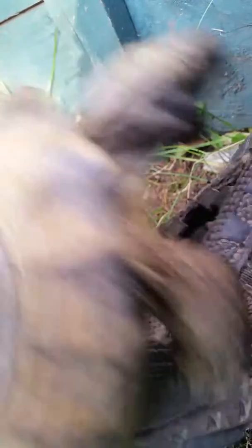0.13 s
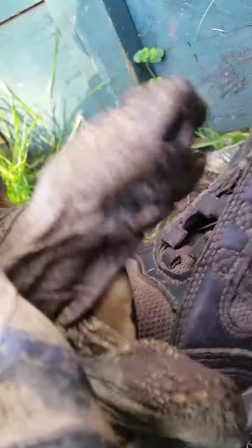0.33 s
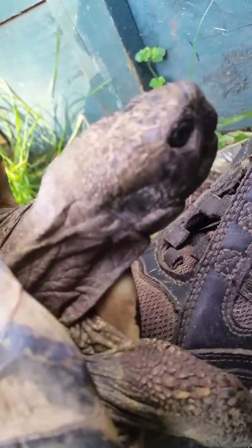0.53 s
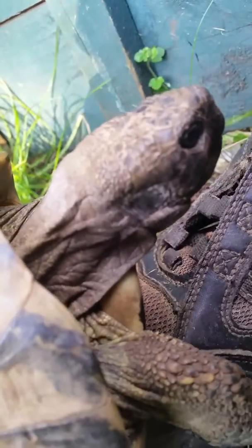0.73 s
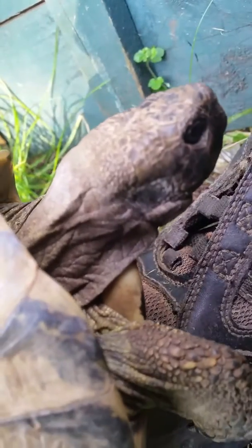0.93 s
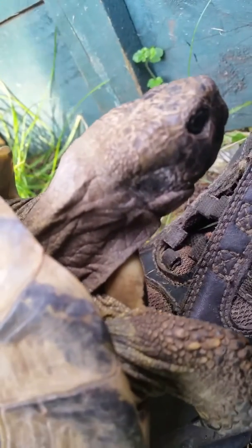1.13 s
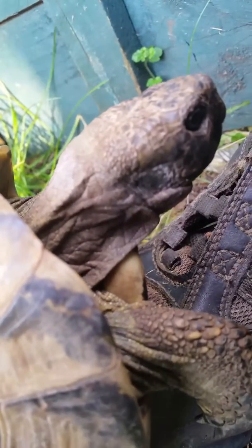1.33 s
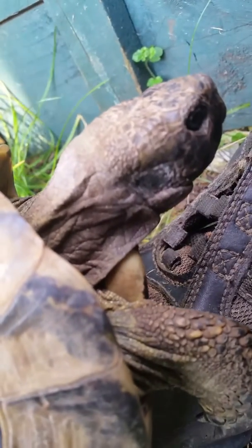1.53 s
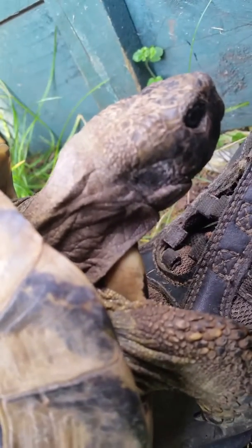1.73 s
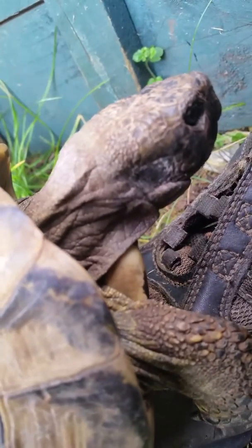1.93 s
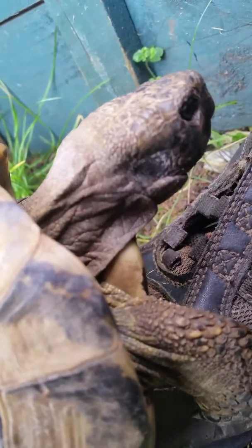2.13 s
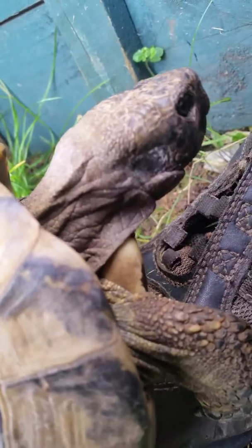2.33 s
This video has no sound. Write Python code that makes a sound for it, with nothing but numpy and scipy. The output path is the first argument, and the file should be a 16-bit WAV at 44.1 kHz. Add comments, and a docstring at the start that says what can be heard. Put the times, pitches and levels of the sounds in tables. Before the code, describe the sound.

A tortoise close by lets out one short nasal squeak that breaks fuller, sags and ends in a breathy hiss; shell and legs bump dully, then quiet garden air, low rumble and faint bird whistles.

```python
"""A garden: broadband air, a low rumble and dull shuffling as filtered noise, far whistles as swept sines.
A shell tap, as decaying modes, precedes the one squeak of a mating tortoise close by. Air noise and a thin
harmonic note start together; the note breaks into a fuller one, sags, turns hoarse and runs out as a hiss.
From the break on, shell and legs bump softly as damped low rings; late on, two scuffs scrape as resonant
noise. Voice, air and taps also return as a faint, bright diffuse echo of the yard."""
import sys
import numpy as np
from scipy import signal
from scipy.fft import rfft, irfft
from scipy.io import wavfile

SR = 44100
rng = np.random.default_rng(int(sys.argv[2]) if len(sys.argv) > 2 else 0)


def put_to_file(sound):
    """Save the sound as 16-bit audio at rate SR, in the file named by the first command-line argument."""
    columns = np.atleast_2d(sound).T  # one column per channel
    safe = np.clip(columns, -1, 1)
    whole_steps = np.round(safe * 32767)
    wavfile.write(sys.argv[1], SR, whole_steps.astype(np.int16))


N = 110250


def undb(db):
    """Level: decibels to amplitude gain."""
    return 10 ** (np.asarray(db) / 20)


def unit(x):
    """Normalisation: scale to rms 1."""
    return x / np.sqrt(np.mean(x ** 2))


def times():
    """Time axis: seconds at every sample."""
    return np.arange(N) / SR


def freqs():
    """Frequency axis: Hz at every spectral bin, at least 1."""
    return np.maximum(np.arange(N // 2 + 1) * SR / N, 1)


def curve(rows, axis=1):
    """Linear interpolation in time through one column of (t/s, value, ..) rows."""
    rows = np.array(rows)
    return np.interp(times(), rows[:, 0], rows[:, axis])


def colour(rows, axis=1):
    """Spectral envelope: gain per bin from one column of (f/Hz, level/dB, ..) rows, over log frequency."""
    rows = np.array(rows)
    return undb(np.interp(np.log(freqs()), np.log(rows[:, 0]), rows[:, axis]))


def band(hz, width):
    """Resonance: gain per bin of a simple resonator applied twice."""
    detuning = (freqs() ** 2 - hz ** 2) / (freqs() * width)
    return 1 / (1 + detuning ** 2)


def low_pass(hz):
    """Smooth low-pass: gain per bin, one half at hz."""
    return 1 / (1 + (freqs() / hz) ** 4)


def shape(x, gain):
    """Linear filtering: multiply the spectrum by a gain per bin."""
    return irfft(rfft(x) * gain, N)


def noise(gain):
    """Coloured noise: filtered white noise of rms 1."""
    return unit(shape(rng.standard_normal(N), gain))


def waver(hz):
    """Random modulation: smooth noise of rms 1 up to about hz."""
    return noise(low_pass(hz))


def ramp(at, length):
    """Sigmoid transition: a smooth step from 0 to 1 centred on at."""
    return .5 + .5 * np.tanh(2 * (times() - at) / length)


def decay(age, t60):
    """Exponential decay: a fall of 60 dB in t60 seconds."""
    return np.exp(-np.log(1000) * age / t60)


def pan(x, db):
    """Interaural level difference: place a sound by its left minus right level."""
    return x * undb(np.array([[db], [-db]]) / 2)


PORT_LAG_S, BASS_LAG_SHARE, LAG_CORNER_HZ = 0.000428, 0.36, 787


def port_lag():
    """Arrival-time difference: a phase delay for the right side, shorter in the bass."""
    treble_share = 1 / (1 + (LAG_CORNER_HZ / freqs()) ** 8)
    share = BASS_LAG_SHARE + (1 - BASS_LAG_SHARE) * treble_share
    return np.exp(-2j * np.pi * freqs() * PORT_LAG_S * share)


def echoes(x, t60):
    """Diffuse reverberation: convolution with decaying noise, independent left and right."""
    onset = ramp(0.0056, 0.0069)
    tail = rng.standard_normal((2, N)) * decay(times(), t60) * onset
    tail = tail / np.sqrt(np.sum(tail ** 2) / 2)
    return signal.fftconvolve(x[None], tail, axes=1)[:, :N]


# spectrum of the outdoor air: f/Hz, relative spectral level/dB
GARDEN_SPECTRUM = [(20, -1.5), (40, -7.5), (62, -5), (90, -1), (130, -1), (200, -7), (300, -25.5),
                   (450, -22), (800, -30), (1300, -32.5), (2200, -42), (4500, -41), (6500, -44.5),
                   (8500, -74), (10500, -56.5), (13000, -42.5), (15800, -43)]
# strength of the rumble: t/s, level/dB
RUMBLE_LEVEL = [(0, -52.5), (.8, -54.5), (1.2, -51), (2.5, -49)]
GARDEN_DB, GARDEN_SWELL_DB = -53, 0.02
RUMBLE_HZ, RUMBLE_WIDTH_HZ = 64.7, 19.3
BASS_LIKENESS, LIKENESS_HZ = 0.59, 900  # left-right correlation in the bass, and where it has halved


def garden():
    """Partially coherent noise: air alike left and right only in the bass, plus a resonant low rumble."""
    like = BASS_LIKENESS * low_pass(LIKENESS_HZ)
    spectrum = colour(GARDEN_SPECTRUM)
    mid = shape(rng.standard_normal(N), spectrum * np.sqrt(1 + like))
    side = shape(rng.standard_normal(N), spectrum * np.sqrt(1 - like))
    swell = undb(GARDEN_DB + GARDEN_SWELL_DB * waver(3.3))
    air = unit(np.array([mid + side, mid - side])) * swell
    rumble = undb(curve(RUMBLE_LEVEL)) * noise(band(RUMBLE_HZ, RUMBLE_WIDTH_HZ))
    return air + pan(rumble, db=-2.5)


# strength of the rubbing common to both sides: t/s, level/dB
SHUFFLE_LEVEL = [(0, -65.5), (.12, -59.5), (.3, -48.5), (.52, -54.5), (.7, -59.5), (.85, -58.5),
                 (1.05, -61), (1.13, -63), (1.2, -60.5), (1.3, -73), (1.48, -59), (1.58, -66), (1.72, -65),
                 (1.9, -68.5), (2.5, -64)]
# spectrum of the rubbing: f/Hz, relative level/dB
SHUFFLE_SPECTRUM = [(40, -17), (110, -1.5), (260, 2), (450, -7), (900, -14.5), (1500, -32.5), (3500, -31.5),
                    (8000, -52.5), (16000, -57.5)]
SHUFFLE_FLICKER_DB, SHUFFLE_WIDTH = 2, 0.75  # width: independent noise per side against the common noise


def shuffle():
    """Friction noise: dull, uneven rubbing as the tortoise shifts its weight on the ground."""
    gain = colour(SHUFFLE_SPECTRUM)
    common = noise(gain)
    separate = np.array([noise(gain), noise(gain)])
    level = undb(curve(SHUFFLE_LEVEL) + SHUFFLE_FLICKER_DB * waver(30))
    return (common + SHUFFLE_WIDTH * separate) * level


# bird whistles: t/s, length/s, start f/Hz, middle f/Hz, end f/Hz, peak level/dB before panning
BIRD_WHISTLES = [(0.107, 0.06, 5560, 5780, 5580, -69), (0.719, 0.039, 6130, 6600, 6400, -70),
                 (0.84, .11, 4190, 4210, 4230, -76.5), (1.007, 0.12, 7970, 7700, 7870, -84.5),
                 (1.228, 0.046, 5050, 4630, 4160, -73), (1.337, 0.03, 6350, 6520, 6570, -75.5),
                 (1.414, 0.023, 4440, 4810, 5520, -75.5), (1.426, 0.086, 6480, 6320, 6050, -74),
                 (1.579, 0.076, 6420, 6360, 6490, -73.5), (1.718, 0.071, 6540, 6450, 6240, -74),
                 (1.867, 0.061, 6350, 6520, 6550, -78.5), (2.07, 0.21, 6670, 6670, 6590, -79.5)]
BIRD_WAVER, BIRD_ECHO_DB, BIRD_T60_S = 0.016, 3, 0.7  # waver: rms share of the pitch


def birds():
    """Frequency modulation: thin whistles on parabolic pitch arcs, blurred by diffuse echo."""
    song = 0
    for at, length, start_hz, mid_hz, end_hz, db in BIRD_WHISTLES:
        progress = np.clip((times() - at) / length, 0, 1)
        arc = np.polyfit([0, .5, 1], [start_hz, mid_hz, end_hz], 2)
        hz = np.polyval(arc, progress) * (1 + BIRD_WAVER * waver(150))
        envelope = np.sqrt(np.abs(np.sin(np.pi * progress)))
        song = song + undb(db) * envelope * np.sin(2 * np.pi * np.cumsum(hz) / SR)
    return pan(song, db=7.0) + undb(BIRD_ECHO_DB) * echoes(song, BIRD_T60_S)


# sharp taps of the shell: t/s, level/dB
SHELL_TAPS = [(.15, -52.5), (.487, -31)]
# modes of the tapped shell: f/Hz, level/dB against the tap, t60/s
SHELL_MODES = [(298, -11, 0.062), (431, 2, 0.016), (697, 1, 0.0046), (1620, -8.5, .007),
               (2300, -12.5, 0.0032)]


def taps():
    """Modal superposition: each short dry knock is a sum of damped sines of the shell."""
    out = 0
    for at, db in SHELL_TAPS:
        age = np.maximum(times() - at, 0)
        for hz, mode_db, t60 in SHELL_MODES:
            out = out + undb(db + mode_db) * np.sin(2 * np.pi * hz * age) * decay(age, t60)
    return pan(out, db=10.5)


# air through the open mouth: t/s, level/dB, extra treble level/dB
AIR_LEVEL = [(.165, -79, -9), (.18, -62.5, -3.5), (.228, -54.5, -6), (.243, -51.5, -8.5), (.262, -50, -3),
             (.29, -48, 3), (.335, -40, -2.5), (.362, -38, 0.5), (.385, -40.5, 8), (.408, -41, 7),
             (.43, -43.5, -1.5), (.48, -45.5, -1), (.53, -55.5, -16), (.58, -85, -1)]
# spectrum of the mouth air: f/Hz, left level/dB, right level/dB (both relative)
MOUTH_SPECTRUM = [(200, -17, 3), (500, 10.5, -6), (935, -7, 4), (1455, 6.5, -25), (1820, -25, -9.5),
                  (2300, -9, -10), (2820, -6.5, -0.5), (3350, 9, -5), (4040, 1, -5.5), (4680, -10.5, -2),
                  (5720, 5.5, 1), (6100, 0.5, -10.5), (7000, 1, -8.5), (8120, -19, -18.5), (8440, -4, -6.5),
                  (9430, -17.5, -28.5), (10540, -4, -29), (11730, 1, -2), (12220, 8, -23.5),
                  (12380, -0.5, -6), (13460, -12, -12.5), (14800, -1, -23), (15600, -15, -28.5)]
AIR_LIKENESS, AIR_FLUTTER_DB, AIR_FLUTTER_HZ = 0.62, 1.5, 220  # likeness: left-right correlation


def hiss():
    """Turbulence noise: air rushes through the mouth, brightens after its loudest and outlasts the note."""
    jet, stray = rng.standard_normal((2, N))
    right_jet = AIR_LIKENESS * jet + np.sqrt(1 - AIR_LIKENESS ** 2) * stray
    left = shape(jet, colour(MOUTH_SPECTRUM, axis=1))
    right = shape(right_jet, colour(MOUTH_SPECTRUM, axis=2) * port_lag())
    air = unit(np.array([left, right]))
    treble = shape(air, 1 / (1 + (9000 / freqs()) ** 4))
    air = air + treble * (undb(curve(AIR_LEVEL, axis=2)) - 1)
    level = undb(curve(AIR_LEVEL) + AIR_FLUTTER_DB * waver(AIR_FLUTTER_HZ))
    return air * level * (times() < AIR_LEVEL[-1][0])


# pitch of the squeak: t/s, f/Hz
SQUEAK_PITCH = [(.172, 693.5), (.183, 639.3), (.2, 615.8), (.236, 614.7), (.242, 578), (.257, 566),
                (.32, 549), (.375, 516), (.395, 503), (.425, 478)]
# strength of the squeak's fundamental: t/s, rms level/dB before shimmer and panning
SQUEAK_LEVEL = [(.168, -72), (.177, -43), (.195, -34), (.232, -27), (.245, -23), (.315, -22.5), (.37, -25),
                (.415, -30), (.429, -44.5)]
# harmonics from the 2nd up, against the fundamental: thin level/dB, full level/dB, pressed level/dB
HARMONICS = [(-8, -23, -19), (-26, -29.5, -20.5), (-26.5, -31, -22.5), (-20.5, -32, -26.5),
             (-19, -34.5, -18), (-31.5, -32.5, -24), (-31.5, -43, -28), (-21, -20.5, -48),
             (-31, -29.5, -31), (-35.5, -44, -28), (-55, -41.5, -43)]
# stereo place of the voice: f/Hz, left minus right level/dB
VOICE_BALANCE = [(550, -1), (1100, 6), (1650, 8), (2300, 9), (2800, -12.5), (3300, 13), (4400, -6),
                 (5100, -2), (5700, -10.5), (6800, 7), (9000, -4.5)]
BREAK_S, BREAK_LENGTH_S, PRESSED_S, PRESSING_S = .239, 0.0033, 0.31, 0.05
HOARSE_S, HOARSENING_S = 0.356, 0.0195
# rms shares of the pitch; hoarseness and the break (at its midpoint) add to the clean jitter
CLEAN_JITTER, HOARSE_JITTER, BREAK_JITTER = .003, .017, .01
HOARSE_SHIMMER = 0.065  # rms share of the amplitude
# fade in dB per s, for each multiple above the steady ones
OVERTONE_FADE_DB_PER_S, FADE_FROM_S, STEADY_MULTIPLES = 57.5, 0.33, 3.2


def squeak():
    """Harmonic synthesis: the overtone balance shifts at the break and when pressed; the end is hoarse."""
    hoarse = ramp(HOARSE_S, HOARSENING_S)
    full = ramp(BREAK_S, BREAK_LENGTH_S)
    pressed = ramp(PRESSED_S, PRESSING_S)
    breaking = 4 * full * (1 - full)  # peaks at 1 halfway through the break
    jitter = CLEAN_JITTER + HOARSE_JITTER * hoarse + BREAK_JITTER * breaking
    hz = curve(SQUEAK_PITCH) * (1 + jitter * waver(180))
    phase = 2 * np.pi * np.cumsum(hz) / SR

    # towards the end the overtones die, the high ones fastest
    fade = OVERTONE_FADE_DB_PER_S * np.maximum(times() - FADE_FROM_S, 0)
    voice = np.sin(phase)
    for k, (thin_db, full_db, pressed_db) in enumerate(HARMONICS, 2):
        db = thin_db + full * (full_db - thin_db) + pressed * (pressed_db - full_db)
        db = db - max(k - STEADY_MULTIPLES, 0) * fade
        voice = voice + undb(db) * np.sin(k * phase)

    sounding = (times() > SQUEAK_LEVEL[0][0]) & (times() < SQUEAK_LEVEL[-1][0])
    shimmer = 1 + HOARSE_SHIMMER * hoarse * waver(110)
    voice = np.sqrt(2) * voice * undb(curve(SQUEAK_LEVEL)) * sounding * shimmer
    side = np.sqrt(colour(VOICE_BALANCE))  # half the level difference goes to each side
    return np.array([shape(voice, side), shape(voice, port_lag() / side)])


# soft bumps of shell and legs: t/s, level/dB before softening, f/Hz, t60/s, left minus right level/dB
BODY_BUMPS = [(.248, -23.5, 114.4, 0.16, 12), (0.269, -24.5, 108.8, 0.13, 11.5),
              (.352, -35.5, 247, 0.08, 20), (0.376, -23, 97, 0.068, 9.5), (0.413, -27, 75.5, 0.073, 5.5),
              (.433, -19.5, 104.2, 0.051, 8.5), (.492, -31, 75.6, 0.1, 13), (.787, -38.5, 80, 0.049, 19),
              (.892, -41, 434, 0.09, -7.5), (.894, -46.5, 664, 0.044, 2), (.936, -32, 178, 0.087, -3),
              (0.945, -36.5, 111.6, 0.15, 7), (0.956, -39, 211, 0.095, -10), (.982, -34, 75.6, 0.3, 5),
              (1.173, -35, 74.3, 0.2, 1), (1.36, -31.5, 188.3, 0.086, 3.5),
              (1.384, -30, 193.7, 0.065, -2.5), (1.452, -38, 98, 0.096, 0), (1.464, -41.5, 474, 0.078, -6),
              (1.466, -53.5, 737, 0.055, 2), (2.028, -40, 203, 0.107, 0), (2.051, -43.5, 393, 0.055, -7),
              (2.159, -39, 70.8, 0.21, -4), (2.273, -37.5, 66.2, 0.6, 2.5)]
BUMP_ATTACK_S, BUMP_DULL = 0.0027, 2.14  # dull: low-pass corner as a multiple of the pitch
BUMP_RUB, BUMP_RUB_WIDTH = 0.33, 0.69  # rms of the rubbing; its bandwidth as a share of the pitch


def bumps():
    """Damped oscillation: a low ring with rubbing noise around its pitch, low-passed by soft contact."""
    out = 0
    for at, db, hz, t60, pan_db in BODY_BUMPS:
        age = np.maximum(times() - at, 0)
        envelope = (1 - np.exp(-age / BUMP_ATTACK_S)) * decay(age, t60)
        rub = BUMP_RUB * noise(band(hz, hz * BUMP_RUB_WIDTH))
        ring = -np.sin(2 * np.pi * hz * age) + rub
        bump = undb(db) * shape(envelope * ring, low_pass(BUMP_DULL * hz))
        out = out + pan(bump, pan_db)
    return out


# hollow resonances of a claw's scuff: f/Hz, width/Hz, relative level/dB
HOLLOW_RESONANCES = [(563, 210, 4), (1160, 220, -1), (1750, 160, -4), (2300, 500, -13.5)]
# scuffs of a claw: t/s, half length/s of the rise, hollow level/dB, dry hiss level/dB
CLAW_SCUFFS = [(1.544, 0.022, -60.5, -87), (1.7, 0.015, -68, -76.5)]
SCUFF_TAIL = 1.7  # length of the fading side against the rising side
DRY_HZ, DRY_WIDTH_HZ = 5900, 19000


def scuff():
    """Stick-and-scrape noise: brief resonant bursts, the first hollow, the second with more dry hiss."""
    body = sum(undb(db) * band(hz, width) for hz, width, db in HOLLOW_RESONANCES)
    out = 0
    for at, half, hollow_db, dry_db in CLAW_SCUFFS:
        width = half * np.where(times() > at, SCUFF_TAIL, 1)
        envelope = np.exp(-.5 * ((times() - at) / width) ** 2)
        flicker = undb(2 * waver(130))
        grain = []
        for _ in range(2):  # independent left and right
            hollow = undb(hollow_db) * noise(body)
            dry_hiss = undb(dry_db) * noise(band(DRY_HZ, DRY_WIDTH_HZ))
            grain.append(hollow + dry_hiss)
        out = out + np.array(grain) * flicker * envelope
    return pan(out, db=3.5)


# spectrum of the yard's echo: f/Hz, relative level/dB
YARD_SPECTRUM = [(500, -27.5), (800, -8), (1200, 2), (3300, 1.5), (6000, 1.5), (10000, -5.5), (11900, -1.5),
                 (13300, 6.5), (15500, 5.5)]
YARD_T60_S, YARD_DB = 0.89, -14.5


def scene():
    """Superposition: the tortoise up close, its bright echo from the yard, and the garden behind."""
    tortoise = squeak() + hiss() + taps()
    sent = shape(tortoise.mean(axis=0), colour(YARD_SPECTRUM))
    yard = undb(YARD_DB) * echoes(sent, YARD_T60_S)
    return tortoise + yard + bumps() + shuffle() + scuff() + birds() + garden()


TOP_HZ = 15800


def record(dry):
    """Band limitation: a steep elliptic low-pass cuts the top."""
    return signal.sosfilt(signal.ellip(10, .2, 80, TOP_HZ, fs=SR, output="sos"), dry)


dry = scene()
out = record(dry)
put_to_file(out)
```